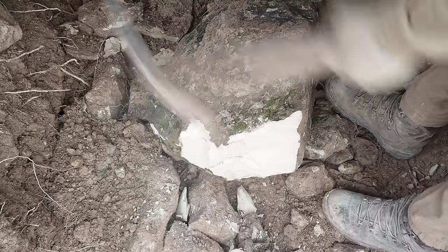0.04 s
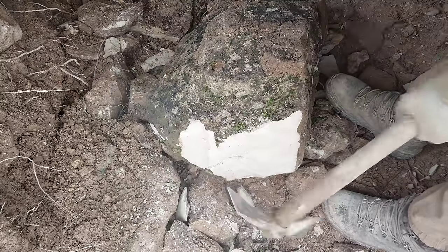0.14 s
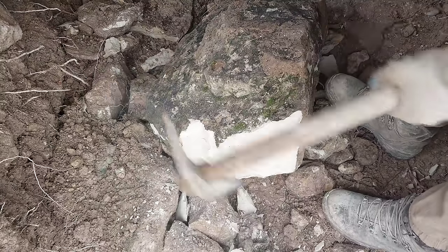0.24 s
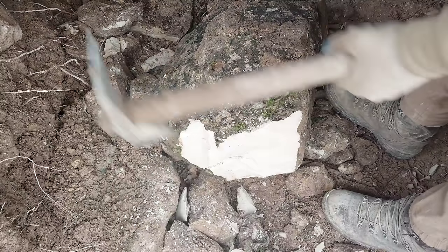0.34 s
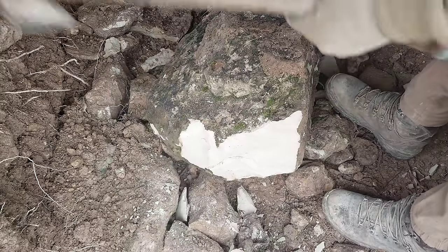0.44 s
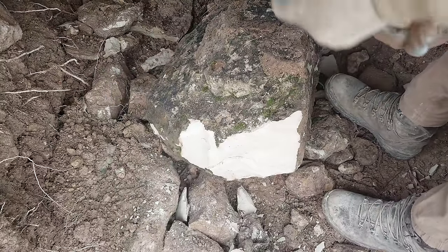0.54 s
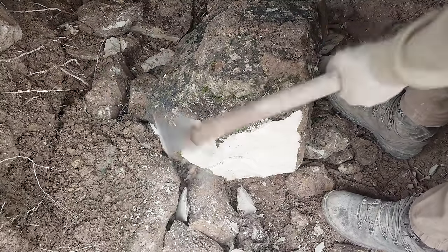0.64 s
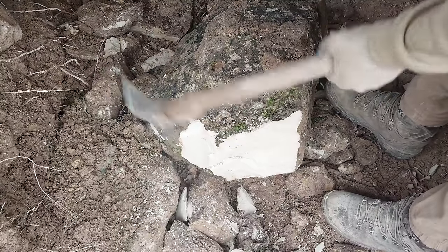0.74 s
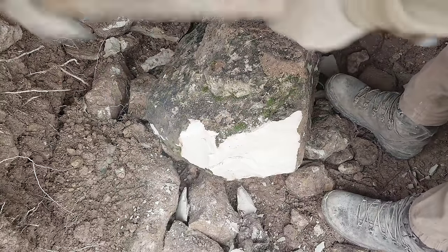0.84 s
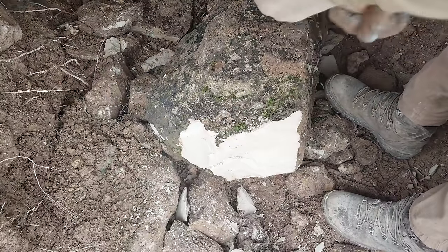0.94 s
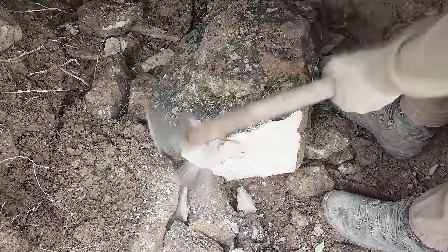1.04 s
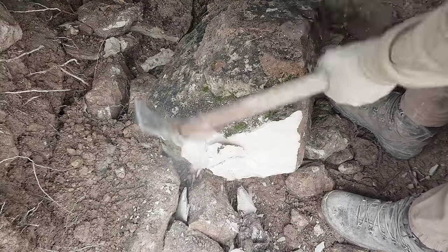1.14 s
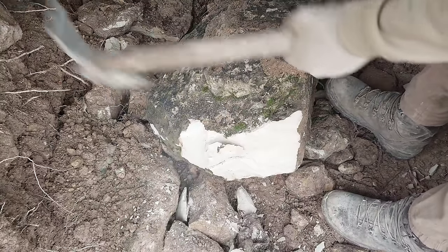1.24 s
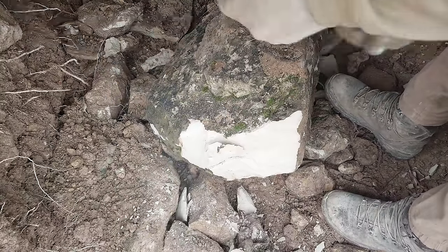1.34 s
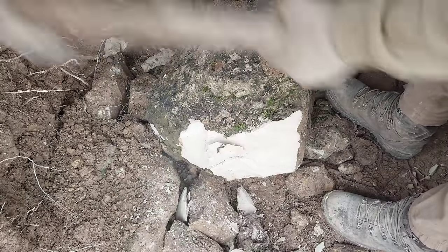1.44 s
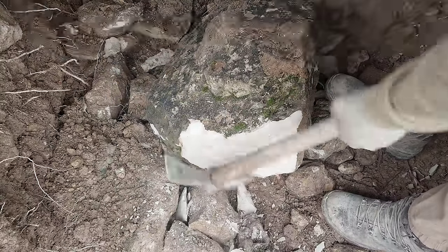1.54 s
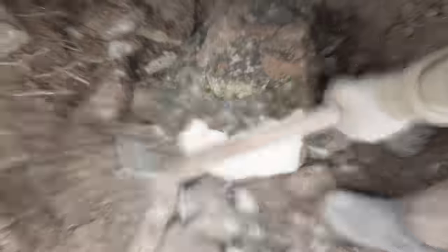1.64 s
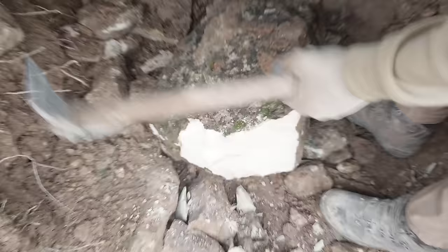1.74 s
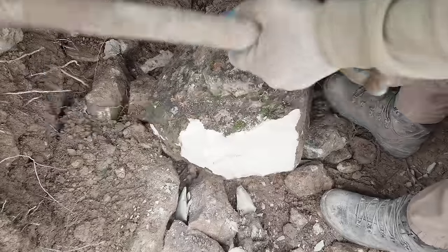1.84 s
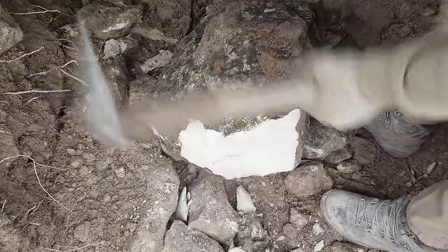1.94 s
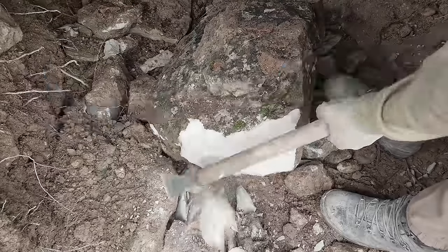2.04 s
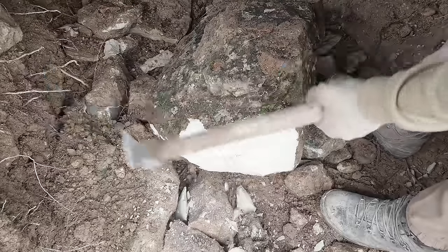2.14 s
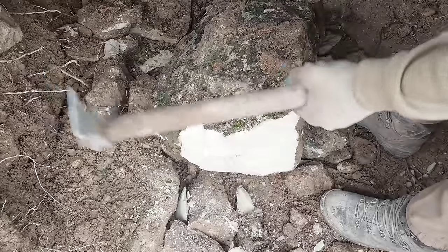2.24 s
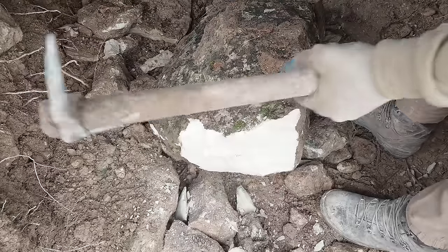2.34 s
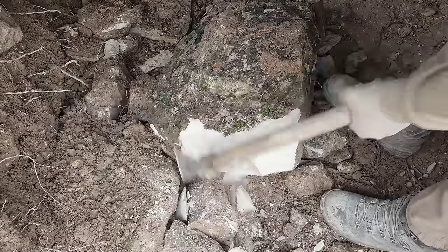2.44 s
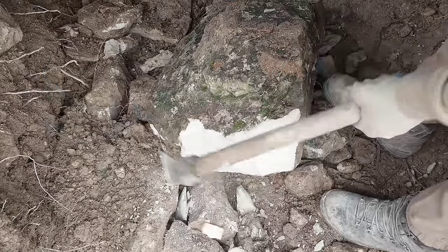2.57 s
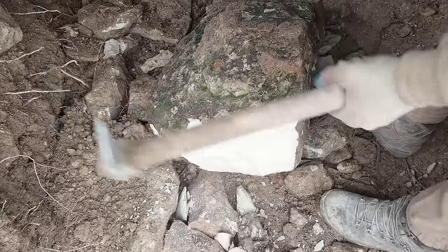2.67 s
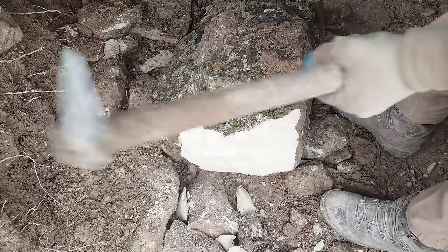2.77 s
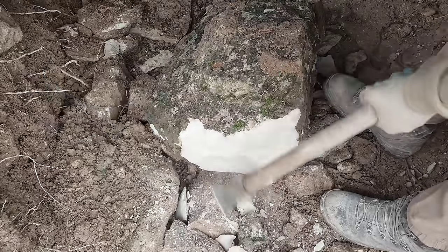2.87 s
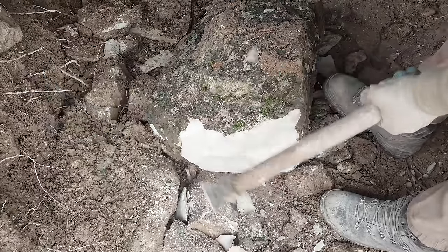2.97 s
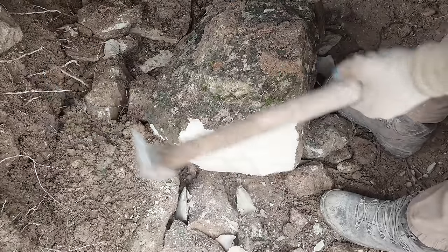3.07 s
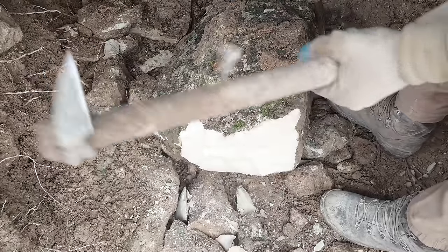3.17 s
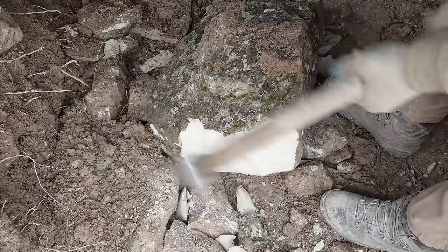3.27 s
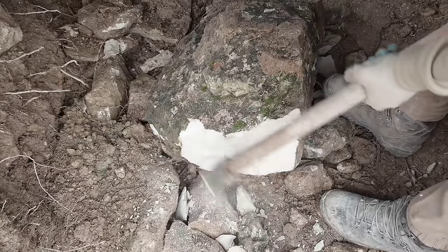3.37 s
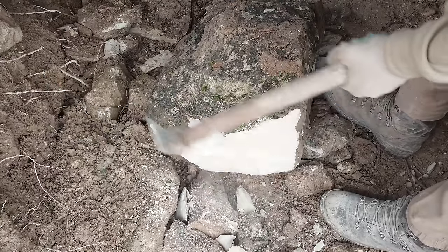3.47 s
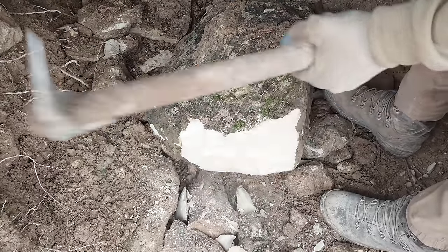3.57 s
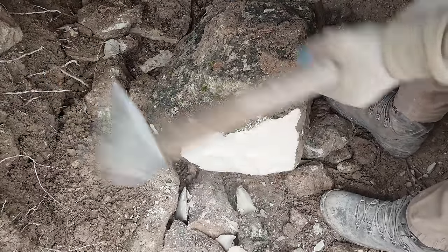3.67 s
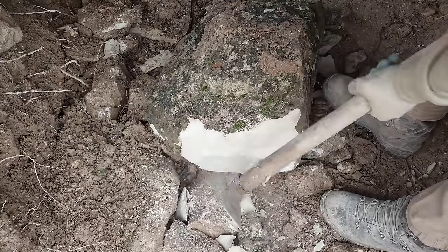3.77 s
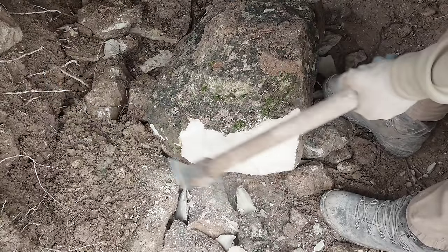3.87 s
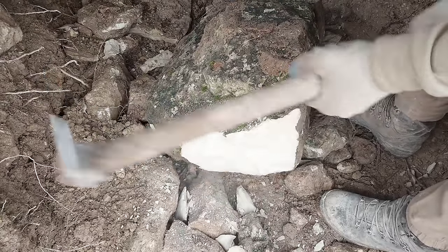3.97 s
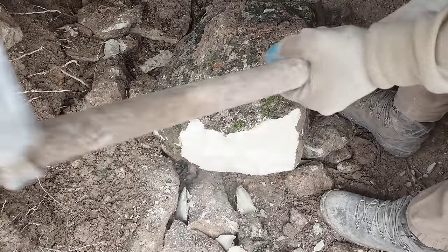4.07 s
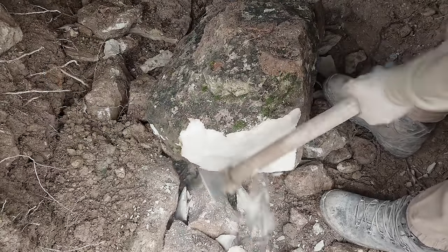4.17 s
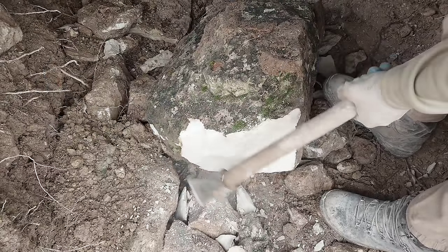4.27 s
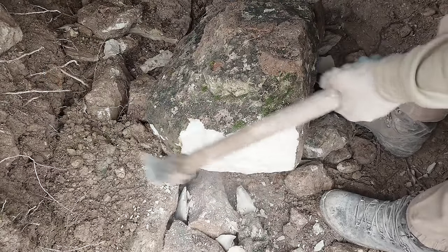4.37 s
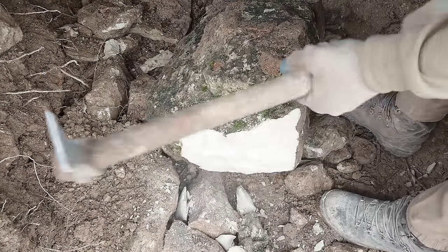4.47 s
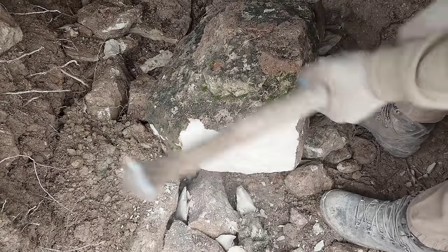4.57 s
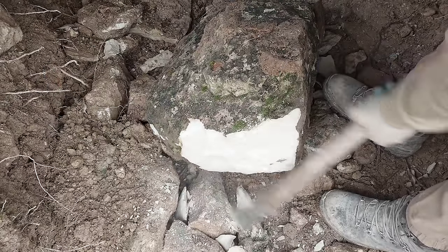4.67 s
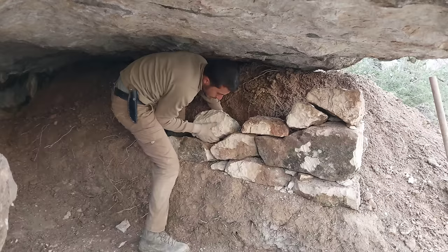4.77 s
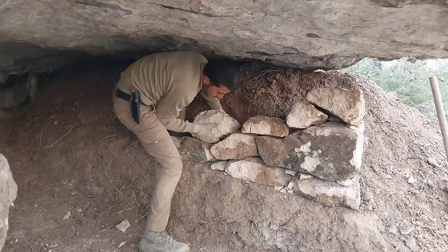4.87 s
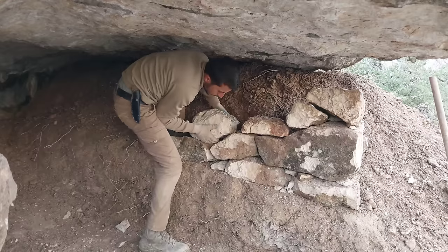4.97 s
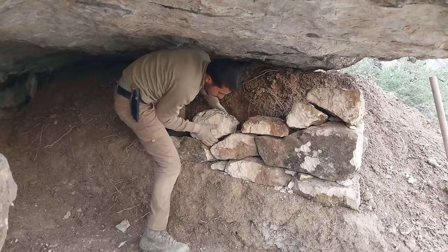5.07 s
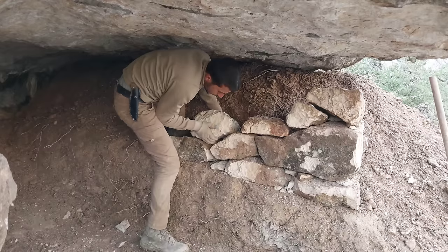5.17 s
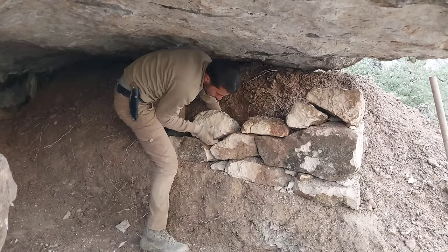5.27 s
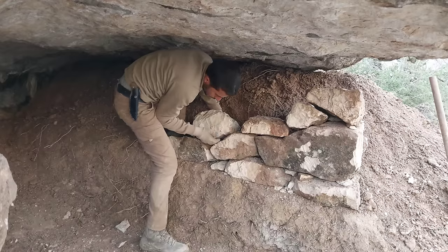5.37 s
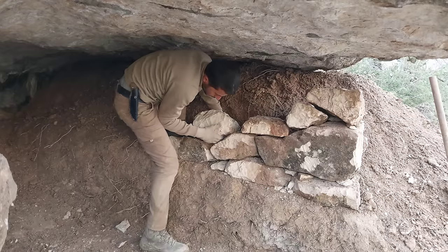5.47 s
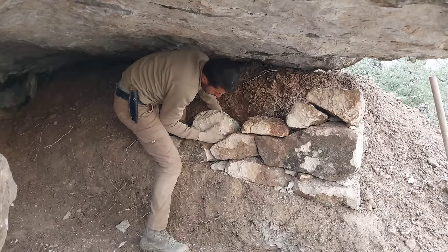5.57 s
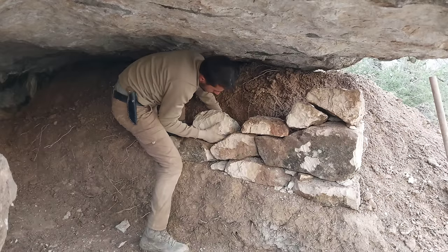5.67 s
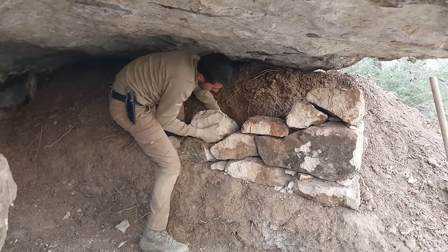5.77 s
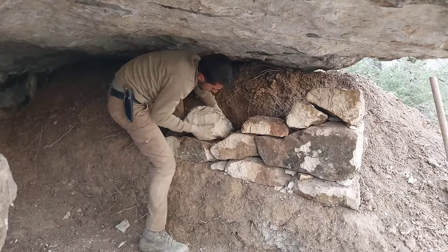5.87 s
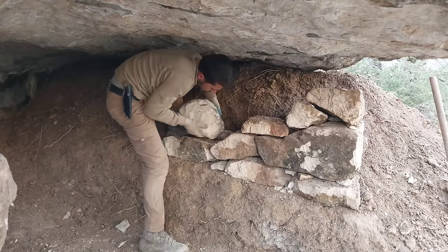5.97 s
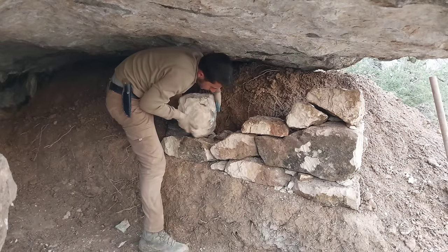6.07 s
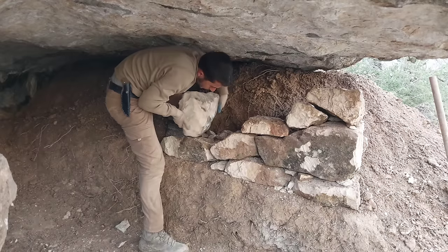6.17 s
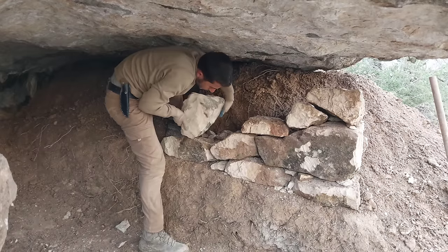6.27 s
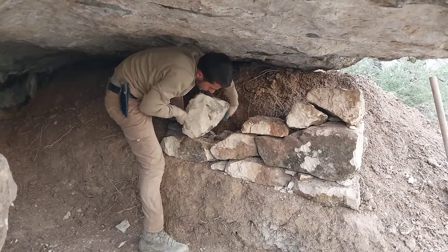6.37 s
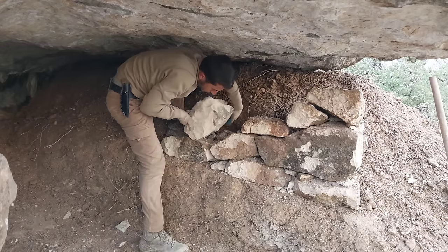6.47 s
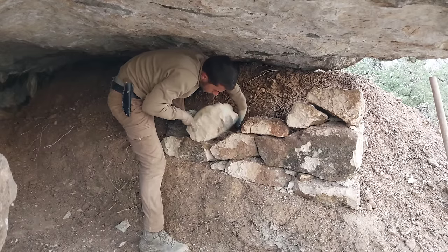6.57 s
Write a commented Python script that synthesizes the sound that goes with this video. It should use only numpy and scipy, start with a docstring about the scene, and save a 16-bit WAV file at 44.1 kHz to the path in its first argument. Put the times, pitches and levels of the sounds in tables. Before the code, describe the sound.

A steel pick cracks hard against a boulder eleven times, chips clacking and grit trickling, then a heavy stone is shoved over gritty earth.

```python
"""After a faint clack, a pick strikes a boulder under a rock overhang, again and again: each blow cracks,
the steel rings briefly, the stone knocks and the roof answers. Chips land, grit trickles, air rumbles on the microphone.
Noise makes the crushing, fading waves the ringing, random grains the loose stone. At 4.77 s the boulder sounds stop
abruptly. A heavy stone on a dry wall, which thuds dully from the start, goes on and is shoved over loose earth."""
import sys
import numpy as np
from scipy import signal
from scipy.fft import rfft, irfft, next_fast_len
from scipy.io import wavfile

SR = 44100
rng = np.random.default_rng(int(sys.argv[2]) if len(sys.argv) > 2 else 0)


def inscribe(sig):
    """Save sig as 16-bit PCM at rate SR to the path in sys.argv[1].

    A 1-D sig is mono; a 2-D sig holds one channel per row.
    Samples are clipped to [-1, 1] before scaling.
    """
    pcm = np.round(np.clip(np.atleast_2d(sig).T, -1, 1) * 32767)
    wavfile.write(sys.argv[1], SR, pcm.astype(np.int16))


N = 291942
TIME = np.arange(N) / SR         # seconds through the whole scene
AGE = np.arange(SR // 3) / SR    # seconds since one short sound began

# pick on rock: t/s, weight level/dB, crack level/dB, edge level/dB, shard f/Hz, ground thump level/dB,
# steel ring level/dB, f/Hz favoured by the point of impact, rebound delay t/s, rebound level/dB,
# thrown grit level/dB, grit flight t/s
BLOWS = [(0.0989, -11.5, -10.5, -11, 1900, -34.5, -10, 11940, 0.023, 1.5, -62.5, 0.21),
         (0.6977, -7.5, -13, -19, 700, -38.5, -17, 7200, 0.023, 3, -75.5, 0.09),
         (1.1008, -7.5, -6.5, -13, 850, -26, -18.5, 7300, 0.028, 3, -58.5, .40),
         (1.56, -13, -10, -6.5, 1900, -32.5, -17, 12640, 0.029, -1, -63.5, 0.24),
         (2.0521, -8.5, -11, -18.5, 5100, -33, -14.5, 5000, 0.029, 4, -62.5, 0.3),
         (2.507, -13.5, -14, -19, 5300, -32.5, -14, 11000, 0.017, -1, -67, .15),
         (2.911, -13.5, -18.5, -14, 6200, -28.5, -12.5, 3200, 0.028, -1.5, -71.5, 0.16),
         (3.351, -8.5, -7, -8, 4600, -22.5, -19.5, 7450, 0.025, -2.5, -57.5, .19),
         (3.7934, -10, -6.5, -7, 2700, -28, -26, 12900, 0.017, 0, -67, 0.23),
         (4.2248, -11, -9.5, -12.5, 3200, -23.5, -27, 11300, 0.025, 5, -63, .18),
         (4.6969, -9, -9.5, -15, 2500, -40, -10, 3100, 0.033, 0.5, -70.5, 0.19)]
# boulder and handle: f/Hz, level/dB, time to fall 60 dB t/s
BODY = [(140, -24.5, 0.16), (268.2, -11, 0.18), (310, -18.5, 0.17), (412, -14, 0.14), (548, -24, .06),
        (747, -21.5, 0.06), (915, -21.5, 0.08)]
# the earth under the boulder: f/Hz, level/dB, time to fall 60 dB t/s
GROUND = [(55, -0.5, 0.18), (90, -5, 0.21)]


def blows(crack_db=3, crush_s=.0035, crack_t60=.036, crumble_db=-15.0, crumble_t60=0.24, body_db=2, steel_db=1,
          crunch_db=-7, crunch_t60=0.11, crunch_hz=1200, crunch_rise_s=0.0027, shard_db=0, shard_q=2.4):
    """The point crushes stone and splits off a shard that colours the crack; crumbs spray,
    steel and boulder ring, the bed crunches and the ground thumps."""
    out = np.zeros((2, N))
    # full strength while the stone is crushed, then a fast fall
    crush = np.minimum(dying(crack_t60) * from_db(60 * crush_s / crack_t60), 1)
    settle = dying(crunch_t60) * rising(crunch_rise_s)
    thump = sum(from_db(db) * np.sin(2 * np.pi * hz * AGE) * dying(t60) for hz, db, t60 in GROUND)
    for (s, weight_db, hard_db, edge_db, shard_hz, ground_db, ring_db,
         favoured_hz, rebound_s, rebound_db, *_) in BLOWS:
        spectrum = crushed(weight_db, hard_db, edge_db)
        crack = from_db(crack_db) * noise(spectrum, len(AGE)) * crush
        fractures = grains(len(AGE), per_s=3400, spread_db=4.5)
        crumbs = from_db(crumble_db) * coloured(fractures, spectrum) * dying(crumble_t60)
        shard = from_db(shard_db) * resonant(crack + crumbs, shard_hz, shard_q)
        crunch = from_db(crunch_db) * low_pass(noise(spectrum, len(AGE)), crunch_hz) * settle
        body = ring(BODY, scatter_db=1.5, detune=.04, grind_hz=34, steady=2.7, ear_phase=.42)
        body = from_db(weight_db + body_db) * body
        head = from_db(ring_db + steel_db) * steel(favoured_hz)
        add(out, s, crack + crumbs + shard + crunch + body + head + from_db(ground_db) * thump)
        add(out, s + rebound_s, from_db(rebound_db) * rebound())
    return out


# crushed stone, the starting tone colour of every blow: f/Hz, level/dB
CONTACT = [(40, -15.5), (290, -2.5), (780, -0.5), (1800, -1.5), (3400, 0), (6000, 3.5), (12500, 1.5)]


def crushed(weight_db, crack_db, edge_db):
    """A heavy blow adds bass, a hard one crack and a sharp one treble to the spectrum of crushed stone."""
    lift = [(400, weight_db), (1800, crack_db), (5000, crack_db), (7300, edge_db)]   # f/Hz, level/dB
    return [(hz, db + at_hz(lift, hz)) for hz, db in CONTACT]


# steel pick head: f/Hz, level/dB, time to fall 60 dB t/s
STEEL = [(1880, -7, 0.11), (2024, -1.5, .07), (2420, -1.5, .05), (3086, -6.5, 0.15), (3140, -13.5, 0.13),
         (4900, -4, .045), (5740, -8.5, .05), (7330, -2, .08), (10620, -0.5, .07), (11320, -1, 0.12),
         (13000, -2, 0.1)]


def steel(favoured_hz, reach_octaves=.22, others_db=-6):
    """The point of impact decides which ringing tones of the pick head are strongest."""
    modes = []
    for hz, db, t60 in STEEL:
        nearness = np.exp(-(np.log2(hz / favoured_hz) / reach_octaves) ** 2)
        modes.append((hz, db + others_db * (1 - nearness), t60))
    return ring(modes, scatter_db=2.52, detune=0.0035, grind_hz=99, steady=0.3, ear_phase=0.2)


def ring(modes, scatter_db, detune, grind_hz, steady, ear_phase):
    """Fading tones: each blow loads them differently, and grinding contact jolts their height and phase."""
    out = np.zeros((2, len(AGE)))
    for hz, db, t60 in modes:
        gain = from_db(db + scatter_db * rng.standard_normal()) * rng.choice([-1, 1])
        pitch = hz * (1 + detune * rng.uniform(-0.92, 1))
        # run the filter in first, then keep the settled second half
        jolts = low_pass(rng.standard_normal((2, 2 * len(AGE))), grind_hz)[:, len(AGE):]
        jolts = rms_one(jolts)
        swing = (steady + jolts[0] + 1j * jolts[1]) / np.sqrt(steady ** 2 + 2)
        # the two ears are out of step: one leads and the other lags by ear_phase radians
        phase = ear_phase * rng.choice([-1, 1]) * np.array([[1], [-1]])
        wave = np.imag(swing * np.exp(1j * (2 * np.pi * pitch * AGE + phase)))
        out += gain * dying(t60) * wave
    return out


def rebound(t60=0.049, rise_s=0.0027):
    """The tool comes down a second time on crushed stone, much duller."""
    # f/Hz, level/dB
    spectrum = [(60, -6), (280, 2.0), (900, -5.0), (1800, -13.0), (5000, -16.5), (14000, -31.0)]
    return noise(spectrum, len(AGE)) * dying(t60) * rising(rise_s)


# larger chips landing and the pick glancing off: t/s, level/dB, pitch of the piece f/Hz,
# fall below that pitch in dB/octave, fall above it in dB/octave, time to fall 60 dB t/s
CHIPS = [(0.016, -32, 2214, 3.5, 0, .045), (0.1218, -8, 1775, 1.5, 0, 0.039),
         (0.165, -21, 3000, 0, -1, 0.07), (0.3956, -43.5, 5280, 4, 9, .047),
         (0.88, -41, 809, 1, 4.5, 0.029), (0.989, -40, 601, 2, 8.5, .05),
         (1.045, -42.5, 6750, 2.5, 8, 0.057), (1.1745, -11.5, 5430, 7, 1.5, 0.033),
         (1.2196, -23.5, 1860, 0, 2, 0.039), (1.2936, -29.5, 1900, 6, 2.5, 0.037),
         (1.3678, -36.5, 2860, 2, 2, 0.037), (1.4787, -34.5, 2130, 2.5, 0, 0.042),
         (1.5901, -4.5, 1834, 2, 6, 0.035), (1.666, -22, 6700, 3, -4, 0.064),
         (1.69, -5, 5770, 0, -2, 0.042), (1.765, -21.5, 6700, 3.5, 2, 0.031),
         (2.2127, -25, 970, 7, 2, 0.036), (2.2532, -29, 4600, -3, 0, 0.013),
         (2.3427, -38.5, 1780, -2, 4.5, 0.13), (2.446, -37, 1800, 5.5, 4, 0.047),
         (2.6026, -22, 1150, 5, 3, 0.018), (2.7026, -33.5, 11250, 10.5, -10, 0.034),
         (3.4047, -10, 6630, 4.5, 1.5, 0.056), (3.472, -29.5, 3050, -1.5, -1.5, .06),
         (3.5531, -20.5, 760, 12, 5, 0.036), (3.6235, -4, 1800, 23, 2, 0.026),
         (3.6877, -31, 2260, 2, 1.2, 0.036), (3.8471, -13, 2040, 0.5, -0.9, 0.025),
         (3.873, -4, 1150, 10.5, 1.2, 0.02), (4.1196, -40, 7300, 2.5, 1, 0.022),
         (4.3147, -22, 6800, .2, 0.5, 0.061), (4.331, -26, 3740, 1, 0.2, 0.067),
         (4.45, -31.5, 1900, -0.5, 1.5, 0.018), (4.6505, -39, 5850, 4, 4.5, 0.042)]


def chips(chip_db=4):
    """The larger pieces, each at its own moment."""
    out = np.zeros((2, N))
    for s, db, hz, fall_below, fall_above, t60 in CHIPS:
        add(out, s, from_db(db + chip_db) * chip(hz, fall_below, fall_above, t60))
    return out


def chip(hz, fall_below, fall_above, t60, bass_hz=400, top_hz=14000, rise_s=.0004, piece_db=4, piece_q=11):
    """A small stone clacks and skids: a burst of tiny contacts, coloured by the piece's own resonance."""
    bass_db = -fall_below * np.log2(hz / bass_hz)
    top_db = -fall_above * np.log2(top_hz / hz)
    spectrum = [(60, bass_db - 2.5), (bass_hz, bass_db), (hz, 0), (top_hz, top_db)]
    contacts = coloured(grains(len(AGE), per_s=11000, spread_db=1.5), spectrum)
    contacts = contacts * dying(t60) * rising(rise_s)
    return contacts + from_db(piece_db) * resonant(contacts, hz, piece_q)


def pebbles(count=9, over_grit_db=16, extra_db=8, flight_spread=0.68, low_hz=1000, high_hz=6000, t60=0.021):
    """Every blow also flings a few pebbles of random size, which come down among its grit."""
    out = np.zeros((2, N))
    for s, *_, grit_db, flight_s in BLOWS:
        for k, (when, size, strength) in enumerate(rng.random((count, 3))):
            # each pebble has its own slice of the landing period, at a random moment inside it
            place = 2 * (k + when) / count - 1
            landing_s = s + flight_s * (1 + flight_spread * place)
            pebble_hz = low_hz * (high_hz / low_hz) ** size
            pebble = chip(pebble_hz, fall_below=2.5, fall_above=5.0, t60=t60)
            add(out, landing_s, from_db(grit_db + over_grit_db + extra_db * strength) * pebble)
    return out


# trickling grit: f/Hz, level/dB
GRIT_SPECTRUM = [(180, -30.5), (300, 0), (372, -14.5), (455, 0), (574, -14.5), (1900, -9), (7320, -5),
                 (8790, -16.5), (12900, -4), (16000, -19)]


def grit(tick_db=0, sand_db=-8, tick_t60=0.018):
    """Separate crumbs tick onto the ground over a fine trickle of sand."""
    crumbs = np.abs(grains(N, per_s=130, spread_db=2)[0])
    # every crumb starts a short fade; the tiny offset keeps the filter from slowing down in silence
    landings = signal.lfilter([1], [1, -dying(tick_t60)[1]], 1e-18 + crumbs)
    ticks = rms_one(noise(GRIT_SPECTRUM, N) * landings)
    sand = rms_one(coloured(grains(N, per_s=700, spread_db=-1.5), GRIT_SPECTRUM))
    return grit_fall() * (from_db(tick_db) * ticks + from_db(sand_db) * sand)


def grit_fall(bunching=3.7, trickle_db=-90):
    """Gain in time: each blow's grit falls thickest after its flight time, then thins to a trickle."""
    power = from_db(trickle_db) ** 2
    for s, *_, grit_db, flight_s in BLOWS:
        age = np.maximum(TIME - s, 0) / flight_s
        shower = from_db(grit_db) * (age * np.exp(1 - age)) ** bunching
        power = power + shower ** 2
    return np.sqrt(power)


def hollowed(x, dip_hz=9000, dip_q=2.3, dip_depth=0.77):
    """The knocks are weak in one band of the treble: part of that band is subtracted."""
    return x - dip_depth * resonant(x, dip_hz, dip_q)


# echoes off the roof and walls: delay t/s, level/dB, upper limit f/Hz
ECHOES = [(.0085, -15.5, 697), (0.0245, -12.5, 1500), (0.053, -20.5, 894)]
# blurred sound under the overhang, its tone colour: f/Hz, level/dB
HOLLOW = [(60, -4), (250, -2), (800, -5), (1800, -8), (3500, -9.5), (6000, -11), (12500, -13)]
# how fast that blurred sound dies: f/Hz, time to fall 60 dB t/s
HOLLOW_T60 = [(100, 0.045), (500, 0.031), (2000, 0.12), (6000, 0.1), (14000, 0.062)]


def overhang(x, build_s=0.0077, first_s=0.0017):
    """Rock returns a few dull echoes and a short blurred tail that dies band by band."""
    hz = np.arange(len(AGE) // 2 + 1) * SR / len(AGE)
    wash = rfft(noise(HOLLOW, len(AGE)))
    build = np.clip((AGE - first_s) / build_s, 0, 1)
    edges_hz = [0, 200, 600, 1500, 4000, 8000, SR]
    response = np.zeros((2, len(AGE)))
    for low, high in zip(edges_hz, edges_hz[1:]):
        envelope = dying(at_hz(HOLLOW_T60, (low + high) / 2)) * build
        band = irfft(wash * ((hz >= low) & (hz < high)), len(AGE))
        response += band * envelope / np.linalg.norm(envelope)
    for delay, db, cut_hz in ECHOES:
        click = np.arange(len(AGE)) == round(delay * SR)
        response += from_db(db) * low_pass(1e-18 + click, cut_hz)
    return signal.fftconvolve(x, response, axes=1)[:, :N]


# air on the microphone, its course: t/s, level/dB
RUMBLE = [(0.0, -58.5), (0.25, -59.5), (1.5, -56.5), (1.58, -53.5), (3.24, -59.5), (3.49, -50),
          (4.61, -54.5), (4.77, -73)]
# air on the microphone, its tone colour: f/Hz, level/dB
RUMBLE_SPECTRUM = [(15, -35), (25, -5), (46, 3.5), (69, 5), (137, -3.5), (167, -11.5), (279, -21.5),
                   (374, -28.5), (430, -35.5), (700, -35), (910, -52.5), (1540, -120)]


def rumble(rumble_db=3):
    """Air rumbles on the microphone: deep noise whose level rises and falls."""
    return from_db(rumble_db) * level(RUMBLE) * rms_one(noise(RUMBLE_SPECTRUM, N))


def digging():
    """Everything heard at the boulder; the roof answers the stone sounds but not the rumble."""
    direct = hollowed(blows() + chips() + pebbles()) + grit()
    return direct + overhang(direct) + rumble()


# heavy stone settling: t/s, boom level/dB, boom f/Hz, boom length t/s, knock level/dB, scuff level/dB
THUDS = [(0.171, -24, 404, 0.04, -28, -89), (1.695, -38, 191, 0.038, -7.5, -11.5),
         (1.724, -25, 142, 0.11, -8.5, -61), (3.554, -15, 148, 0.02, -27, -40),
         (3.690, -37.5, 461, 0.074, -29.5, -61), (5.037, -37.5, 61.5, .12, -33.5, -67.5),
         (5.169, -50, 400, 0.14, -24, -66.5), (5.237, -26.5, 85.3, 0.11, -14, -34.5),
         (6.293, -24.5, 58, 0.16, -13, -55.5)]
# dull knock of a heavy stone: f/Hz, level/dB
KNOCK = [(50, -10), (150, 1), (280, 1.5), (400, -4), (600, -13.5), (800, -30.5), (1500, -45), (4000, -75)]


def thuds(swell_s=0.0012, knock_s=0.13, scuff_s=0.14, scuff_hz=2500):
    """A heavy stone drops onto its bed: a dull knock, a gritty scuff and a boom from the ground."""
    out = np.zeros((2, N))
    for s, boom_db, hz, length, knock_db, scuff_db in THUDS:
        boom = from_db(boom_db) * np.sin(2 * np.pi * hz * AGE) * braked(length)
        knock = from_db(knock_db) * noise(KNOCK, len(AGE)) * braked(knock_s)
        rubbing = low_pass(grains(len(AGE), per_s=6000, spread_db=2.0), scuff_hz, order=6)
        scuff = from_db(scuff_db) * rubbing * braked(scuff_s)
        add(out, s, (boom + knock) * rising(swell_s) + scuff)
    return out


def braked(length, friction=1.53):
    """A rocking stone holds at first, then friction stops it ever faster; 60 dB down after length."""
    return np.exp(-np.log(1000) * (AGE / length) ** friction)


# the stone is shoved over loose earth: start t/s, length t/s, level/dB
SHOVES = [(4.969, .28, -63.5), (5.225, 0.12, -59.5), (5.461, 0.28, -61), (5.736, 0.11, -61),
          (5.884, 0.47, -58), (6.265, .2, -59), (6.577, 0.18, -58.5)]
# loose earth under a sliding stone: f/Hz, level/dB
SLIDE_SPECTRUM = [(590, -24), (1000, -10), (1230, -18), (2500, -1), (3980, 0), (6860, 2.5), (8650, -9.5),
                  (13800, -1), (16000, -36)]


def slide(slide_db=-1, attack_share=0.21):
    """Each shove swells quickly and eases off; the earth hisses under the stone."""
    effort = 0
    for s, length, db in SHOVES:
        moments = [s, s + attack_share * length, s + length]
        effort = effort + from_db(db) * np.interp(TIME, moments, [0, 1, 0])
    hiss = rms_one(coloured(grains(N, per_s=11000, spread_db=4.0), SLIDE_SPECTRUM))
    return from_db(slide_db) * effort * hiss


# faint outdoor air: f/Hz, level/dB
AIR = [(15, -34), (25, -8), (87, 2), (1190, -20.5), (3820, -25.5), (4870, -17.5), (5880, -25.5),
       (7110, -14), (8590, -24), (12500, -20), (16000, -21.5)]


def outdoor_air(air_db=-68.5):
    """Faint outdoor air: a steady noise under everything."""
    return from_db(air_db) * rms_one(noise(AIR, N))


def from_db(db):
    """Decibels to gain."""
    return 10 ** (np.asarray(db) / 20)


def rms_one(x):
    """Scale to an average strength (rms) of 1."""
    return x / np.sqrt(np.mean(x ** 2) + 1e-20)


def at_hz(points, hz):
    """Read a (f/Hz, value) table with equal steps per octave."""
    knots, values = np.transpose(points)
    return np.interp(np.log(np.maximum(hz, 1)), np.log(knots), values)


def level(curve):
    """Gain in time from (t/s, level/dB) rows."""
    return from_db(np.interp(TIME, *np.transpose(curve)))


def dying(t60):
    """Fade that falls 60 dB in t60 seconds."""
    return np.exp(-np.log(1000) * AGE / t60)


def rising(rise_s):
    """Soft start that is 63 % up after rise_s."""
    return 1 - np.exp(-AGE / rise_s)


def low_pass(x, hz, order=2):
    """Keep what lies below hz."""
    return signal.sosfilt(signal.butter(order, hz, fs=SR, output="sos"), x)


def resonant(x, hz, q):
    """Keep a band around hz, narrower for a higher q."""
    return signal.lfilter(*signal.iirpeak(hz, q, fs=SR), x)


def add(track, s, sound):
    """Mix a sound in at time s."""
    start = round(s * SR)
    track[:, start:start + sound.shape[-1]] += sound[..., :N - start]


# how alike left and right are: f/Hz, likeness (1 = identical)
LIKENESS = [(60, .6), (140, 0.78), (300, 0.5), (800, 0.77), (1800, 0.7), (4000, 0.043), (14000, 0.093)]


def coloured(pair, spectrum):
    """Two signals become stereo with the given spectrum, alike in the bass and apart in the treble."""
    size = next_fast_len(pair.shape[-1])
    hz = np.arange(size // 2 + 1) * SR / size
    alike = at_hz(LIKENESS, hz)
    mid, side = rfft(pair, size)
    both = np.sqrt((1 + alike) / 2) * mid + np.sqrt((1 - alike) / 2) * side * [[1], [-1]]
    return irfft(both * from_db(at_hz(spectrum, hz)), size)[:, :pair.shape[-1]]


def noise(spectrum, size):
    """Smooth stereo noise."""
    return coloured(rng.standard_normal((2, size)), spectrum)


def grains(size, per_s, spread_db):
    """Tiny fractures of uneven size at random moments, shared by two channels; rms 1."""
    born = rng.random(size) < per_s / SR
    sizes = from_db(spread_db * np.minimum(rng.exponential(1, size), 4))
    return rms_one(born * sizes * rng.standard_normal((2, size)))


def scene(boulder_end_s=4.770):
    """The boulder until its abrupt end; the heavy stone and faint outdoor air throughout."""
    at_boulder = np.clip((boulder_end_s - TIME) * 1000, 0, 1)   # fades out in 1 ms
    return at_boulder * digging() + thuds() + slide() + outdoor_air()


def record(dry, low_cut_hz=42, top_cut_hz=16000):
    """The microphone drops the deep bass; peaks overload and the top is cut."""
    thinned = signal.sosfilt(signal.butter(4, low_cut_hz, "high", fs=SR, output="sos"), dry)
    overloaded = np.clip(thinned, -.92, .92)
    return signal.sosfilt(signal.ellip(10, .1, 70, top_cut_hz, fs=SR, output="sos"), overloaded)


dry = scene()
out = record(dry)
inscribe(out)
```